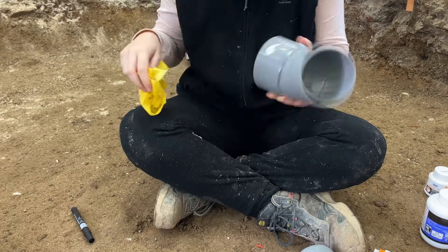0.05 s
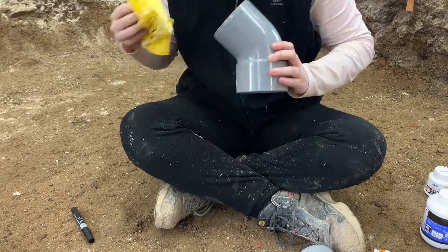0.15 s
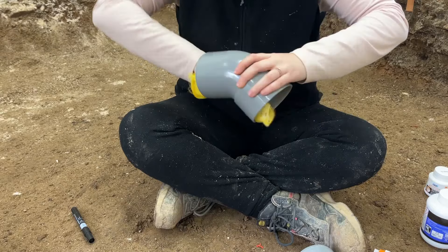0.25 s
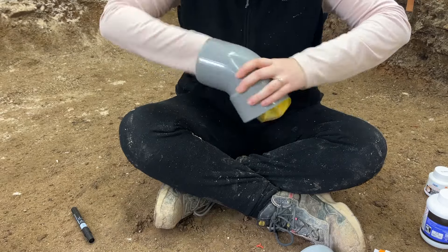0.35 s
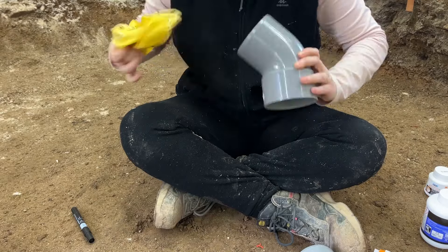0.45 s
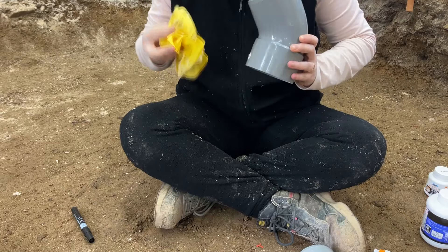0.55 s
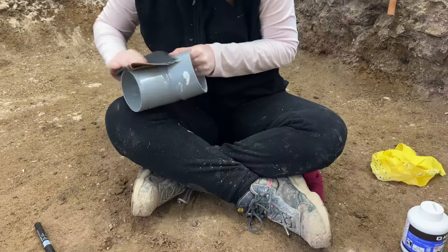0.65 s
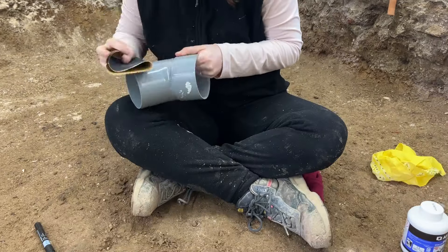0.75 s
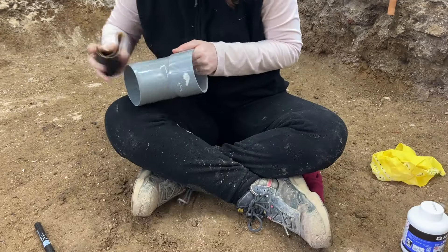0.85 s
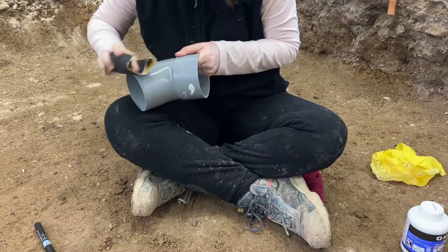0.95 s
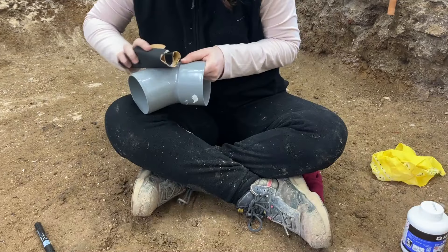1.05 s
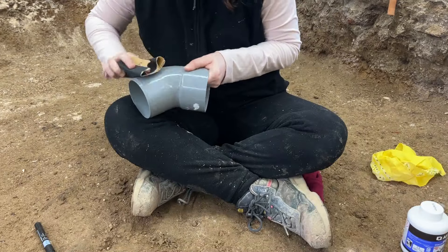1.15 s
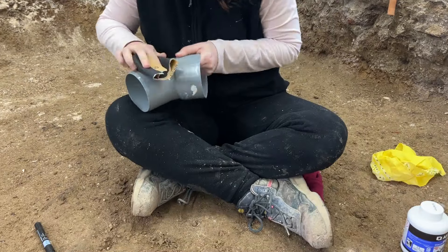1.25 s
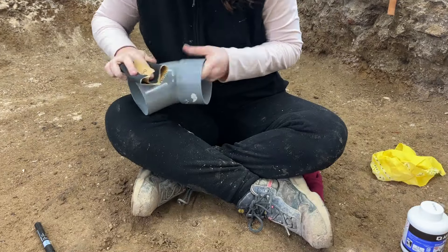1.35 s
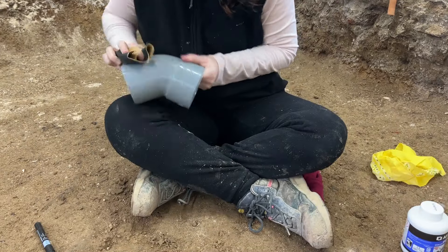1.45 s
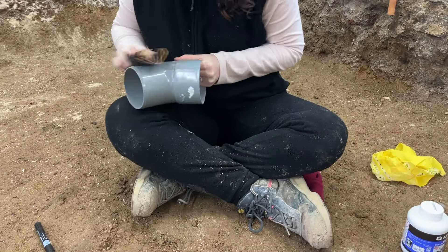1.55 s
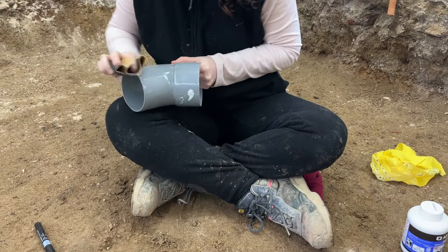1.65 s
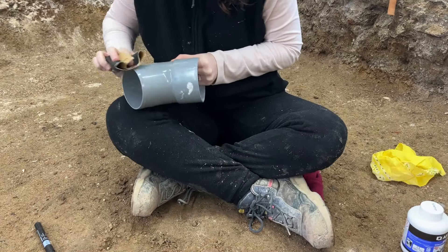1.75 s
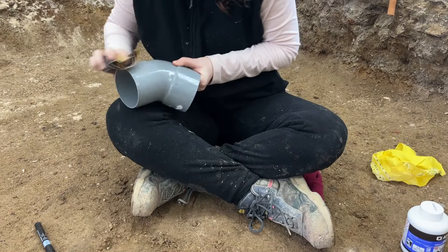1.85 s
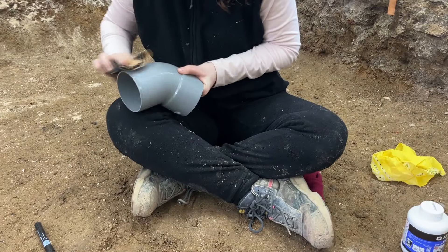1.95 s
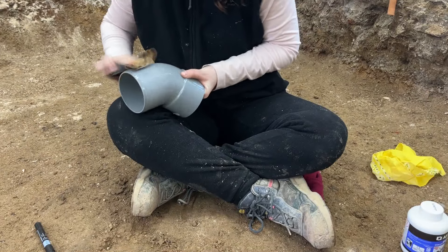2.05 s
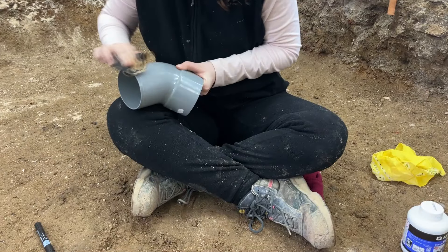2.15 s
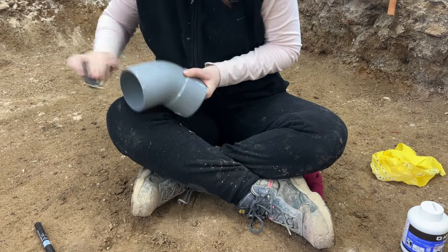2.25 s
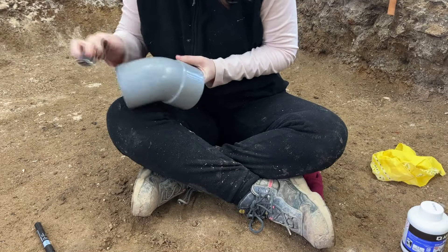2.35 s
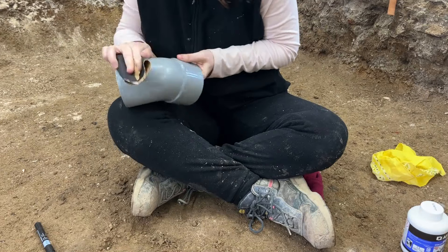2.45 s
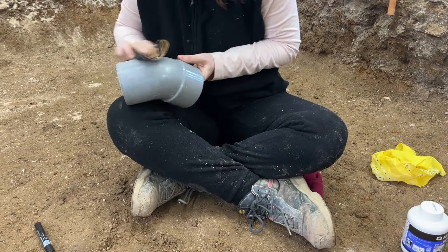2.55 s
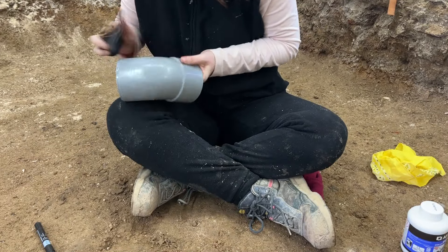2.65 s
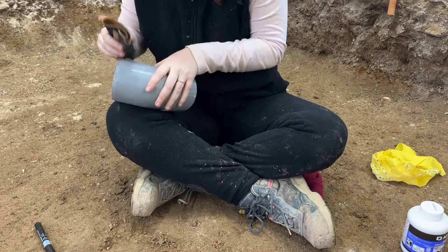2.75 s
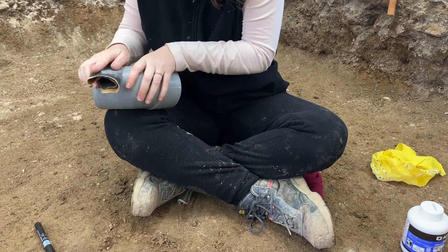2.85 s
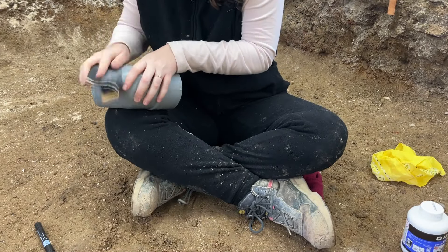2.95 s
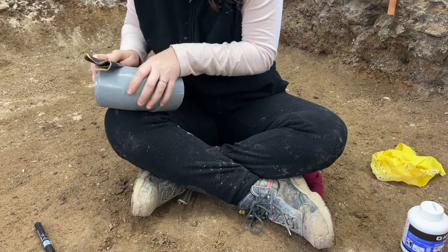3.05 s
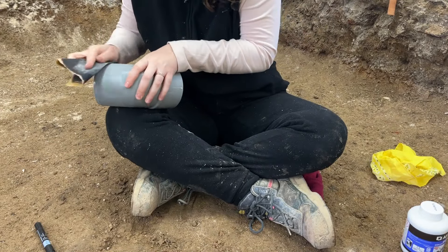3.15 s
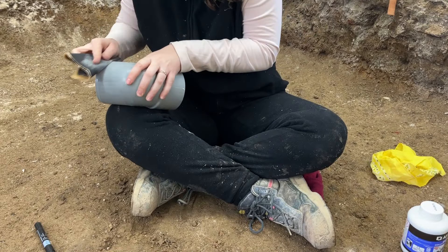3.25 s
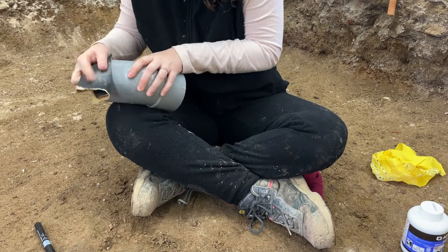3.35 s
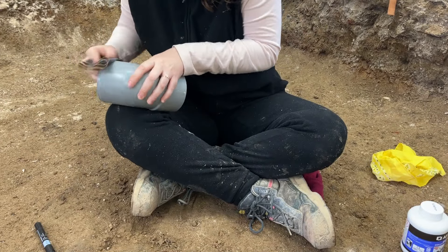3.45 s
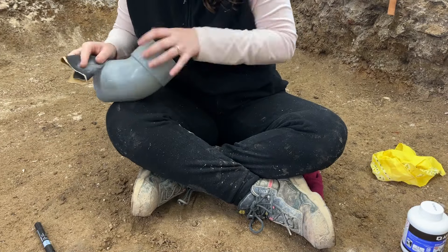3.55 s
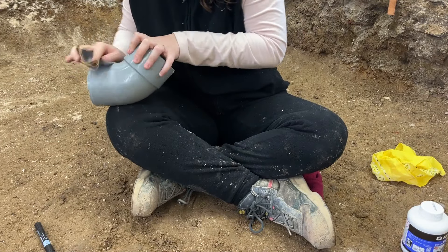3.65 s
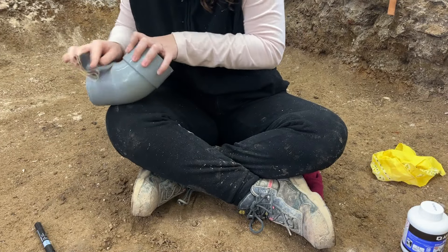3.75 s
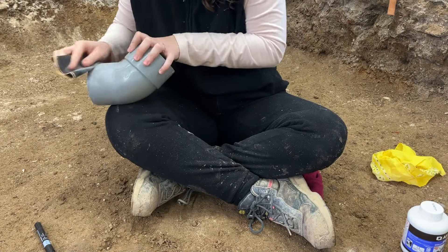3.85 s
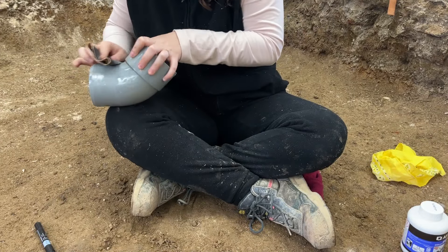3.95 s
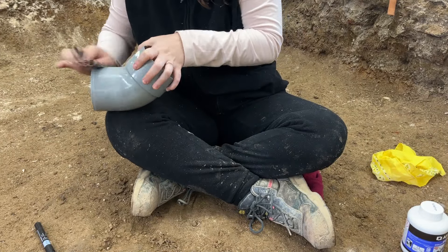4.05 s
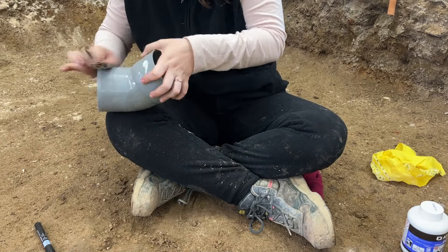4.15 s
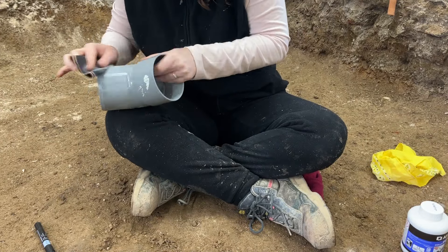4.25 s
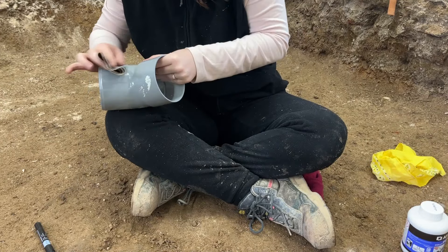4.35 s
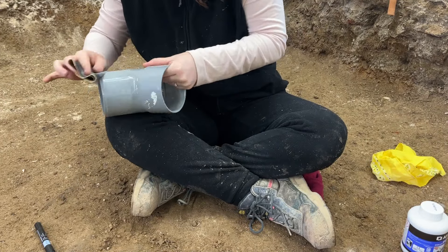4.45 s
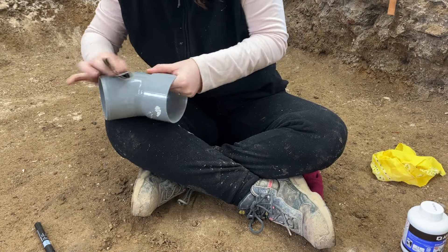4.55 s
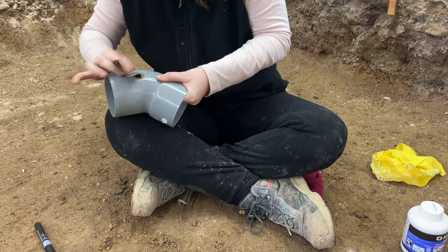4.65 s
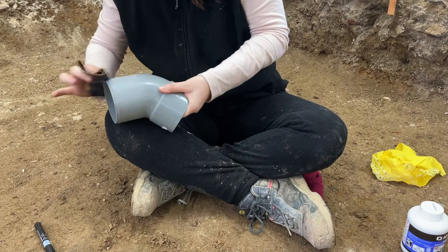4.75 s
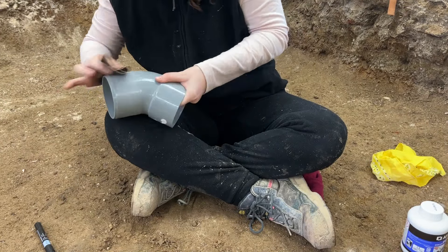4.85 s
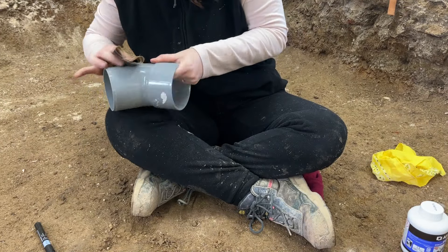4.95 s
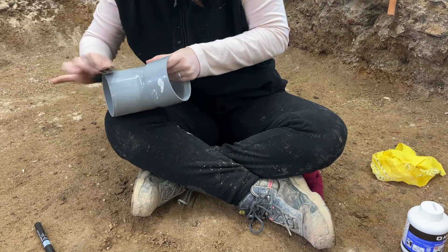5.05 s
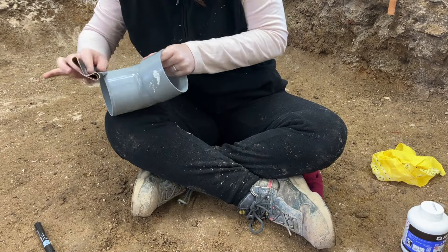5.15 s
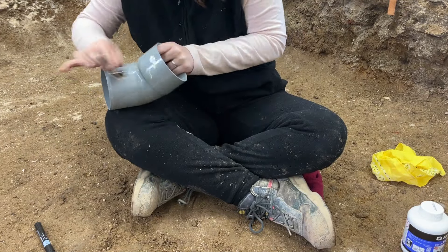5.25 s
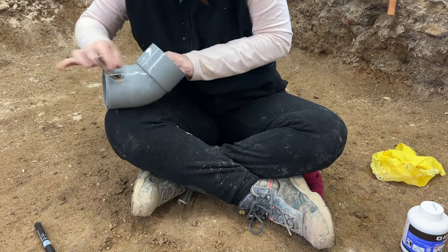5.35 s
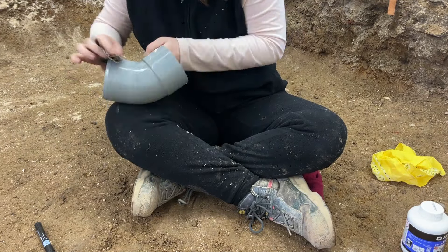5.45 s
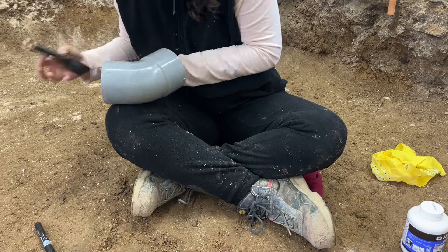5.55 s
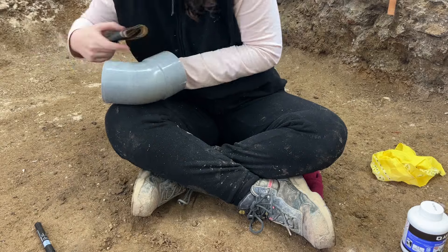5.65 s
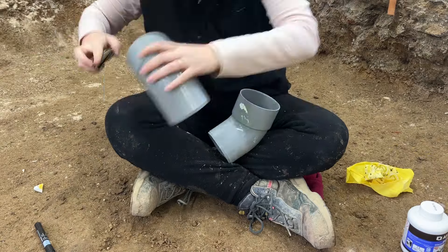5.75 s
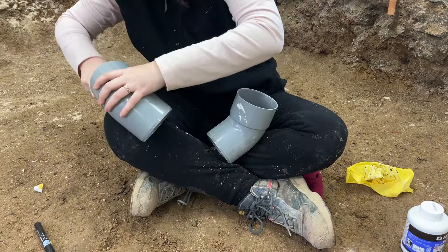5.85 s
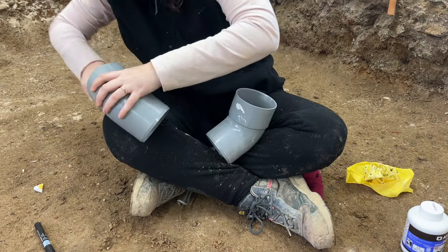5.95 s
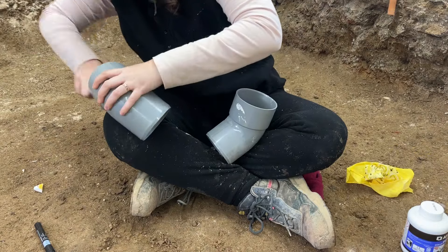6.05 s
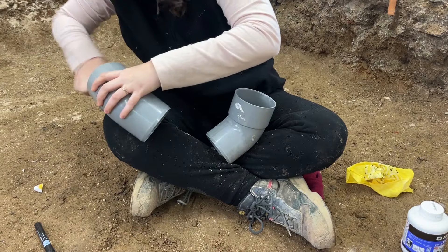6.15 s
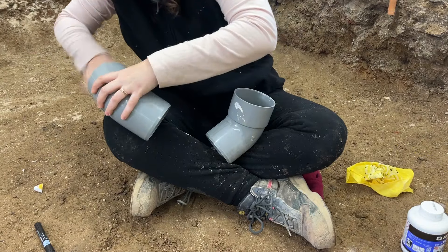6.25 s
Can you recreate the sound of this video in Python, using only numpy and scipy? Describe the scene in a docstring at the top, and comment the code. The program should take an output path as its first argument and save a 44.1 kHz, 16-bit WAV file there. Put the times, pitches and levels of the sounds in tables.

```python
"""Outdoors, a low wavering rumble and a faint air hiss lie under the whole scene, heard by two close mics.
First a hand softly wipes hollow plastic pipe fittings with a cloth. From about 0.6 s it scuffs them with an
abrasive; the scuffing is heard in bouts of throbs that come tens of times a second: the grit hisses once per
throb and shakes the hollow body. The body also rings when knocked, loudest near 1.8 s. Later the knocks are
fewer and softer, while the scuffing goes on to the end."""
import sys
import numpy as np
from scipy import signal
from scipy.fft import rfft, irfft
from scipy.io import wavfile
from scipy.ndimage import uniform_filter1d

SR = 44100
rng = np.random.default_rng(int(sys.argv[2]) if len(sys.argv) > 2 else 0)


def output_pcm(signal):
    """Save a mono or channel-first signal as 16-bit PCM at the path in sys.argv[1].

    Samples are clipped to [-1, 1] before scaling.
    """
    pcm = np.clip(np.atleast_2d(signal).T, -1, 1) * 32767
    wavfile.write(sys.argv[1], SR, np.round(pcm).astype(np.int16))


N = 277389

# How loud the air is: t/s, level/dB
AIR_LEVEL = [(0, -57), (2.5, -55), (4.9, -62), (6.29, -64.5)]
# Tone of the air: f/Hz, relative level/dB
AIR_TONE = [(12, -87), (20, -15), (92, -13), (132, -17), (310, -30), (2500, -46.5), (3200, -58),
            (15000, -65)]
# The low rumble: t/s, level/dB, hum f/Hz
RUMBLE_PATH = [(0, -61, 62), (.13, -52.5, 65.2), (.8, -75, 72.3), (1.6, -62, 58.1), (2.07, -53, 50.94),
               (2.24, -48.5, 70.7), (2.42, -45, 57.74), (2.85, -47, 55.6), (3, -60, 69.9),
               (3.29, -65, 73.8), (3.41, -47.5, 70.2), (3.78, -54, 58.3), (4.1, -49, 59.5),
               (4.27, -38.5, 64), (4.42, -58.5, 67.5), (4.73, -48.5, 75.4), (4.95, -81, 55.3),
               (5.55, -58, 58.9), (6.1, -97, 62.4)]
# Notes at which the hollow pipe rings: f/Hz, width/Hz, relative level/dB
PIPE_NOTES = [(458, 185, -15.5), (702, 230, -8.5), (1285, 288, -4.5), (2050, 340, -11.5),
              (3650, 1470, 16.5), (5700, 990, 0.5)]
# Knocks on the pipe: t/s, ring peak level/dB, favoured f/Hz, relative crack level/dB
PIPE_KNOCKS = [(0.11, -57, 7600, 9), (0.335, -48, 665, -1), (0.429, -45.5, 422, -35),
               (0.684, -36, 690, -22), (0.861, -39.5, 696, -16), (0.91, -45, 315, -11),
               (0.979, -33, 695, -28), (1.013, -33, 710, -9), (1.062, -33.5, 886, -14),
               (1.072, -31.5, 1300, -30), (1.173, -38.5, 630, -4), (1.434, -23, 714, -7),
               (1.463, -30, 1265, -28), (1.532, -34, 2140, -12), (1.619, -40, 655, -26),
               (1.689, -19.5, 1298, -13.5), (1.706, -26, 792, -7), (1.731, -33.5, 714, -26),
               (1.8141, -14.5, 5640, -9), (1.863, -28.5, 1320, -0.5), (1.914, -26, 810, -11),
               (1.922, -26.5, 690, -25), (2.279, -34.5, 750, -8), (2.497, -33, 1000, 3.5),
               (2.635, -31.5, 1120, -15), (2.674, -33, 5900, 2.5), (2.863, -38.5, 750, 2),
               (3.157, -39.5, 871.3, 1.5), (4.062, -41, 730, -13), (4.15, -46, 900, -4),
               (4.171, -39, 698, -37), (4.272, -43.5, 746, -25), (4.417, -38.5, 727, -10),
               (4.786, -33, 755, 0), (5.275, -45, 743, -31), (5.426, -46.5, 700, -20),
               (5.883, -46.5, 436, 3)]
# Tone of the grit's hiss: f/Hz, relative level/dB
GRIT_TONE = [(150, -20), (600, -17), (1500, -16), (2000, -8.5), (2600, -5), (4800, -5), (6500, 0),
             (8200, 1), (11500, 3.5), (13500, -2), (15800, -4.5)]
# How the grip shapes the rubbing: t/s, relative body level/dB, relative treble level/dB
GRIP_LEVELS = [(0, 12, -6.5), (.7, 0.5, -7.5), (1.05, 8, -2.5), (1.35, -8, -2), (1.72, 12.5, -6.5),
               (2.2, 0.5, -3.5), (2.6, 8, -6.5), (3, -14, -7.5), (3.7, -55, -6), (4.15, -4, -6),
               (4.8, -76, -2), (5.8, 9, -8), (6.29, -8, -7.5)]
# Bouts of rubbing: start t/s, end t/s, strokes (rounded in use), first and last relative level/dB,
# dip between strokes/dB (hiss and body each take only a share of it)
RUB_BOUTS = [(0.208, 0.357, 3.6, -57, -57.5, 12.5), (0.371, 0.446, 0.68, -59, -61, -2),
             (0.627, 0.716, 4.5, -34, -37.5, 7.5), (0.734, 0.904, 6, -44, -47, 27),
             (0.912, 0.966, 2, -38.5, -38.5, 4), (0.955, 1.221, 14.2, -35.5, -41.5, 6.5),
             (1.223, 1.37, 7, -35, -35.5, 18), (1.39, 1.462, 2.9, -46.5, -30, 19),
             (1.466, 1.522, 2, -32.5, -40.5, 25), (1.531, 1.551, 1, -38.5, -40, 13.5),
             (1.568, 1.804, 11, -38, -48, 0), (1.811, 1.846, 1, -33, -41.5, 24),
             (1.858, 2.282, 22, -38.5, -39.5, 9), (2.328, 2.36, 1, -53, -58, 20),
             (2.417, 2.528, 4, -41, -45.5, 9.5), (2.539, 2.689, 4.6, -38.5, -47, 11),
             (2.698, 2.729, 2.2, -44, -46.5, 11), (2.799, 2.828, 1, -36, -47, 16),
             (2.841, 2.928, 4.5, -40.5, -36, 12), (2.936, 3.303, 18.2, -32.5, -42.5, 12),
             (3.304, 3.349, 0.77, -56, -45.5, 17), (3.356, 3.468, 4.9, -35.5, -43.5, 14.5),
             (3.474, 3.501, 1.08, -36.5, -36, 15), (3.508, 3.619, 3, -60, -56.5, 7),
             (3.639, 3.758, 6, -38, -37, 7), (3.772, 4.211, 23, -39.5, -44, 5.5),
             (4.247, 5.063, 61, -43.5, -41.5, 5), (5.075, 5.445, 17.4, -42.5, -45.5, 10),
             (5.464, 5.575, 2.75, -43.5, -51, 22.5), (5.581, 5.628, 1.74, -50.5, -47, 14),
             (5.676, 5.712, 1.23, -50, -50, 15), (5.759, 5.775, 0.95, -38.5, -49.5, 23),
             (5.819, 5.865, 0.92, -56.5, -58, 10), (5.868, 5.915, 1.1, -41.5, -50, 14),
             (5.935, 6.105, 5.5, -44.5, -44, 18), (6.099, 6.305, 10.3, -43, -41, 10)]
# How far the left mic is ahead of the right: f/Hz, phase/rad
MIC_LEAD = [(0, 0), (1800, .3), (3000, 1.2), (4900, 0), (6800, -1.5), (8300, -3.14), (12000, -6.28),
            (15800, -9.6)]
# How much louder the left mic is: f/Hz, level/dB
MIC_BALANCE = [(60, 2), (700, 2.5), (1300, 2), (2000, 0), (4190, 7), (9000, -0.5)]
# How alike the two mics sound: f/Hz, likeness from 0 to 1
MIC_LIKENESS = [(100, .995), (400, .8), (1400, .55), (2800, .7), (5500, .72), (9000, .91)]


def gain_of(db):
    """Turns decibels into a number to multiply by."""
    return 10 ** (np.asarray(db) / 20)


def unit_level(x):
    """Scales each row to an average power of 1."""
    return x / np.sqrt(np.mean(x ** 2, axis=-1, keepdims=True) + 1e-20)


def at_pitch(points, hz):
    """Looks up a table at the given frequencies."""
    f, value = np.transpose(points)
    return np.interp(np.log(hz + 1), np.log(f + 1), value)


def over_time(rows):
    """Joins a table's timed points into one curve per column."""
    times, *columns = np.transpose(rows)
    return [np.interp(np.arange(N) / SR, times, column) for column in columns]


def colour(x, tone):
    """Makes each frequency louder or softer as the table says."""
    return irfft(rfft(x) * gain_of(at_pitch(tone, np.fft.rfftfreq(N, 1 / SR))), N)


def resonate(x, hz, width_hz):
    """Keeps the sound near one pitch: shifts it down to zero, smooths it and shifts it back."""
    spin = np.exp(2j * np.pi * np.cumsum(np.full(N, hz)) / SR)
    decay = np.exp(-np.pi * width_hz / SR)
    return 2 * (spin * signal.lfilter([1 - decay], [1, -decay], x / spin)).real


def wander(ms):
    """A smooth random curve, about 1 in size, that changes within about ms."""
    span = int(ms * SR / 1000)
    return unit_level(uniform_filter1d(uniform_filter1d(rng.standard_normal(N), span), span))


def air():
    """Outdoor hiss that wavers, swells a little and then thins."""
    level_db = over_time(AIR_LEVEL)[0] + 2.38 * wander(ms=62)
    return gain_of(level_db) * unit_level(colour(rng.standard_normal((2, N)), AIR_TONE))


def rumble():
    """A low hum that wavers in pitch and swells, over a broader lumpy bass."""
    level_db, hz = over_time(RUMBLE_PATH)
    phase = 2 * np.pi * np.cumsum(hz + 2.5 * wander(ms=40)) / SR
    hum = unit_level(np.sin(phase)) * gain_of(1.5 * wander(ms=80))
    bass = rng.standard_normal((2, N))
    for _ in range(2):
        bass = resonate(bass, hz=53, width_hz=38)
    return gain_of(level_db) * (hum + gain_of(-3.5) * unit_level(bass))


def knocks():
    """A blow cracks and rings the pipe, favouring the notes near its pitch; the grip bends the notes."""
    out, t = np.zeros((2, N)), np.arange(1500) / SR
    hz, width_hz, note_db = np.transpose(PIPE_NOTES)[:, :, None]
    for start_s, peak_db, pitch_hz, crack_db in PIPE_KNOCKS:
        octaves_off = abs(np.log2(hz / pitch_hz))
        bent_hz = hz * np.clip(pitch_hz / hz[octaves_off.argmin()], .7, 1.14)
        fades = gain_of(note_db - 16.8 * octaves_off) * np.exp(-np.pi * width_hz * t)
        ring = (fades * np.sin(2 * np.pi * bent_hz * t)).sum(0)
        # a soft blow with little crack swells more slowly
        rise_s = 0.0049 * gain_of(-.45 * crack_db) * min(1, 1400 / pitch_hz)
        ring *= (1 - np.exp(-t / rise_s)) ** 2
        # high blows crack brighter and shorter
        band = signal.butter(2, [650, 1670 + 2 * min(pitch_hz, 6000)], "bandpass", fs=SR)
        burst = t / 0.0007 * np.exp(-t / 0.0012 * max(1, pitch_hz / 3000))
        crack = signal.lfilter(*band, rng.standard_normal((2, len(t)))) * burst * gain_of(crack_db + 14.5)
        part = out[:, round(start_s * SR):][:, :len(t)]
        part += gain_of(peak_db) * (ring / abs(ring).max() * [[1], [-.3]] + crack)
    return out


def hand():
    """The hand's motion as level, strokes done and dip depth; the loudest bout sets level and dip."""
    rise_db_per_s, fall_db_per_s = 4000, 914
    t = np.arange(N) / SR
    # after 0.67 s the abrasive rests on the pipe between bouts, faintly scuffing
    level_db = np.where(t > 0.67, -62.5 + 4 * wander(ms=140), -95.)
    strokes, dip_db = np.zeros(N), np.zeros(N)
    drift = .04 * wander(ms=48)
    for start, end, count, first_db, last_db, bout_dip_db in RUB_BOUTS:
        progress = (t - start) / (end - start)
        bout_db = first_db + (last_db - first_db) * progress.clip(0, 1)
        bout_db -= rise_db_per_s * (start - t).clip(0) + fall_db_per_s * (t - end).clip(0)
        dip_db = np.where(bout_db > level_db, bout_dip_db, dip_db)
        level_db = np.maximum(bout_db, level_db)
        count = np.ceil(count - .5)
        # the hand runs a little ahead of or behind an even beat, more in long bouts
        beat = count * progress + drift * np.sqrt(count) * np.sin(np.pi * progress)
        strokes = np.where((t > start) & (t <= end), beat, strokes)
    return level_db, strokes, dip_db


def uneven_bite(x, depth_db=2.5):
    """The grit bites unevenly: small patches of pitch briefly swell and sink."""
    slices = signal.stft(x, nperseg=256)[2]
    patches = rng.standard_normal(slices.shape[:0:-1])
    for axis in (0, 1):  # smooth over time, then over pitch
        patches = uniform_filter1d(patches, size=5, axis=axis)
    return signal.istft(slices * gain_of(depth_db * patches.T / patches.std()), nperseg=256)[1][:, :N]


def rubbing():
    """Many tiny grains catch under each stroke; they hiss and shake the hollow pipe."""
    level_db, strokes, dip_db = hand()
    body_db, treble_db = over_time(GRIP_LEVELS)
    skew = 0.92  # under 1: a stroke bites quickly and lets go slowly
    easing = dip_db * np.cos(np.pi * (strokes % 1) ** skew) ** 2 + 2.6 * wander(ms=4)
    easing += np.minimum(dip_db, 0.5) * (strokes % 2 > 1)  # every return stroke is lighter
    grains = gain_of(2.46 * np.minimum(rng.exponential(1, N), 6))  # a few grains catch harder
    grit = unit_level(grains * rng.standard_normal((2, N)))
    hiss = uneven_bite(colour(grit, GRIT_TONE))
    coarse = signal.lfilter(*signal.butter(2, 6000, fs=SR), hiss)
    # the treble dies more at each turn, where the hand is slowest
    treble = (hiss - coarse) * gain_of(treble_db - 0.79 * easing)
    coarse *= gain_of(1.3 * wander(ms=30) - 0.5 * easing)
    # the grit shakes the four lowest notes in lumps
    shaking = grit * gain_of(level_db + body_db + 4.9 * np.minimum(wander(ms=6.6), 1) - 0.39 * easing)
    body = sum(gain_of(db) * resonate(shaking, hz, width) for hz, width, db in PIPE_NOTES[:4])
    # the main hollow note murmurs on through the turns
    murmur = grit * gain_of(level_db - 12 + 7.1 * np.minimum(wander(ms=6.7), 2.1))
    for _ in range(2):
        murmur = resonate(murmur, hz=PIPE_NOTES[1][0], width_hz=226)
    return gain_of(level_db + 5.5) * (coarse + treble) + gain_of(0.5) * body + murmur


def scene():
    """Each source has a direct and a scattered row; the mics hear them with a small lag and a shadow."""
    direct, scattered = rfft(rubbing() + knocks() + rumble() + air())
    hz = np.fft.rfftfreq(N, 1 / SR)
    likeness = at_pitch(MIC_LIKENESS, hz)
    blend = likeness * direct + np.sqrt(1 - likeness ** 2) * scattered
    lead = np.interp(hz, *np.transpose(MIC_LEAD))
    tilt = np.exp(.5j * lead) * gain_of(at_pitch(MIC_BALANCE, hz) / 2)  # half for each mic
    return irfft([direct * tilt, blend / tilt], N)


def record(dry):
    """Cuts away the very highest treble."""
    low_pass = signal.firwin(511, cutoff=15750, window=("kaiser", 9), fs=SR)
    return signal.oaconvolve(dry, low_pass[None], "same")


dry = scene()
out = record(dry)
output_pcm(out)
```